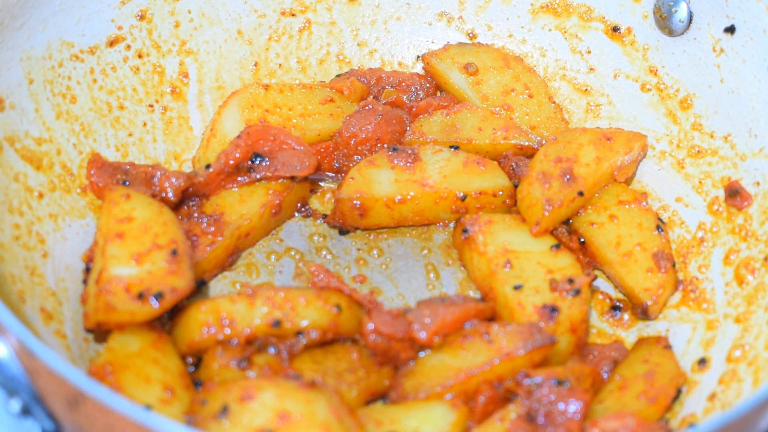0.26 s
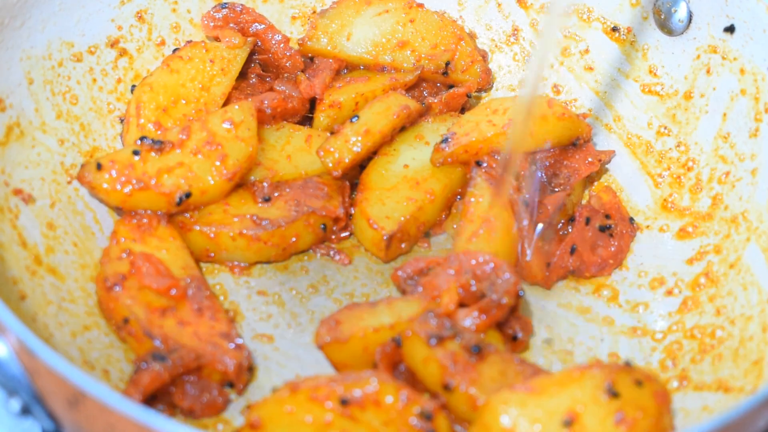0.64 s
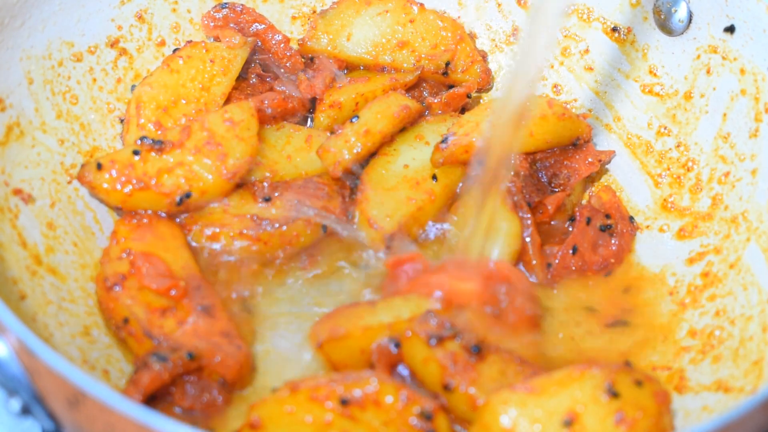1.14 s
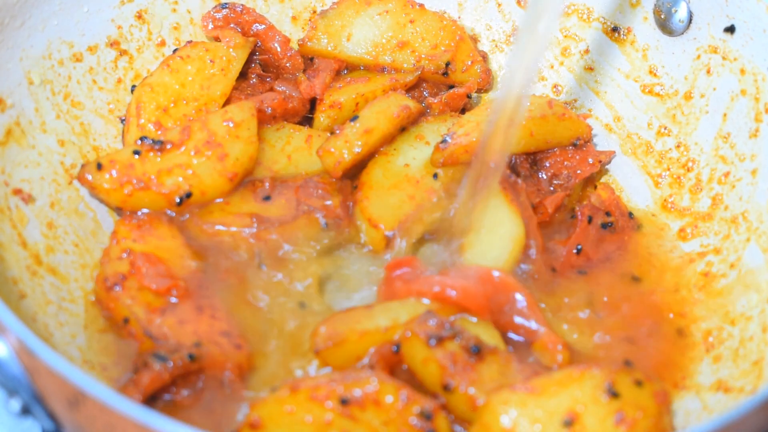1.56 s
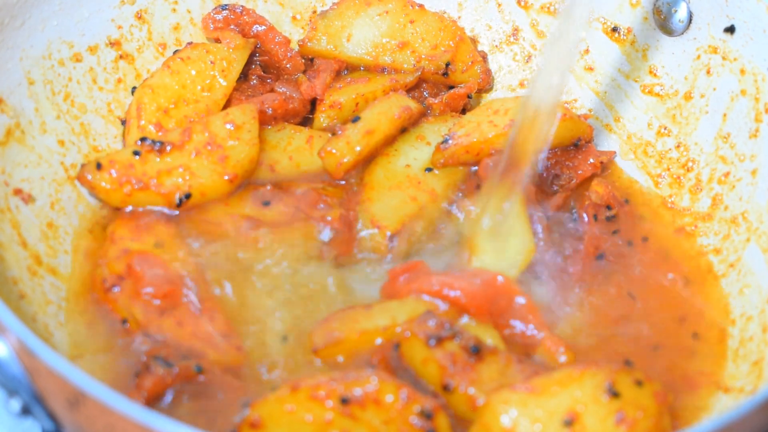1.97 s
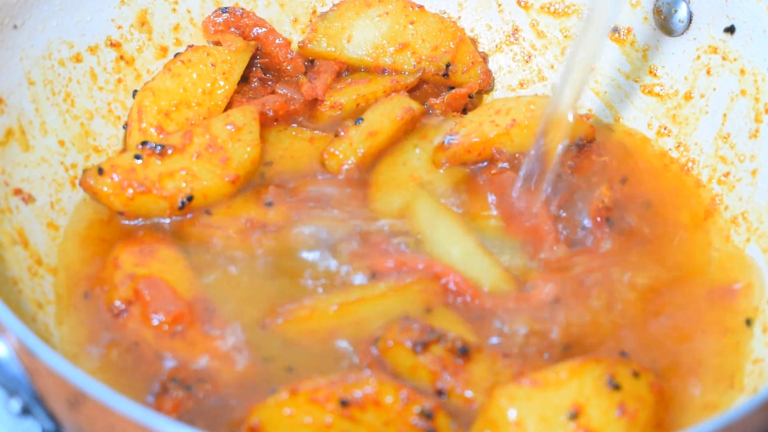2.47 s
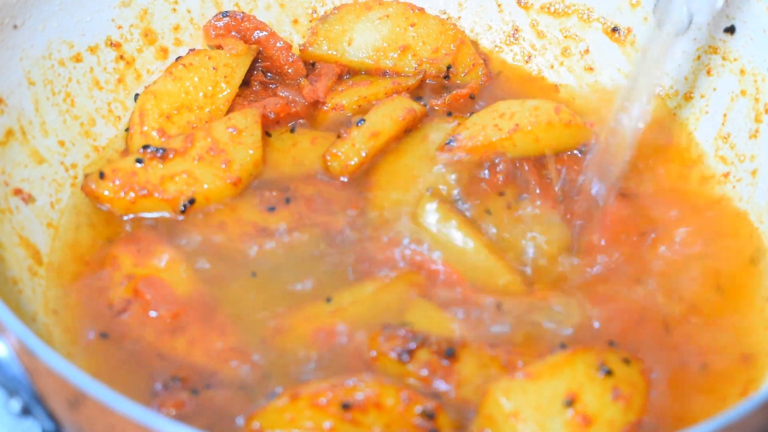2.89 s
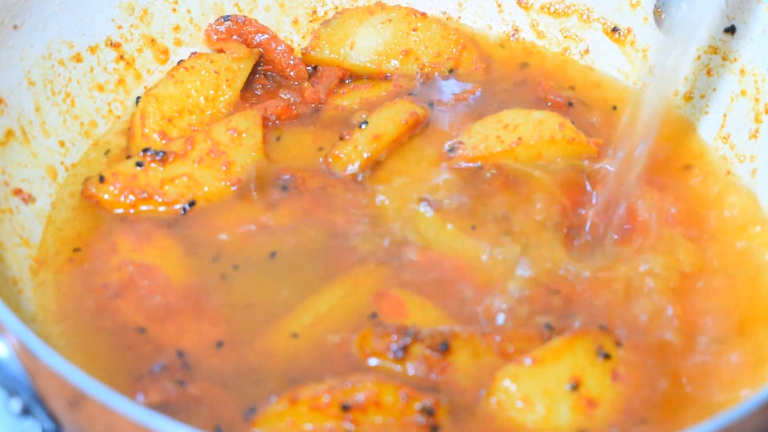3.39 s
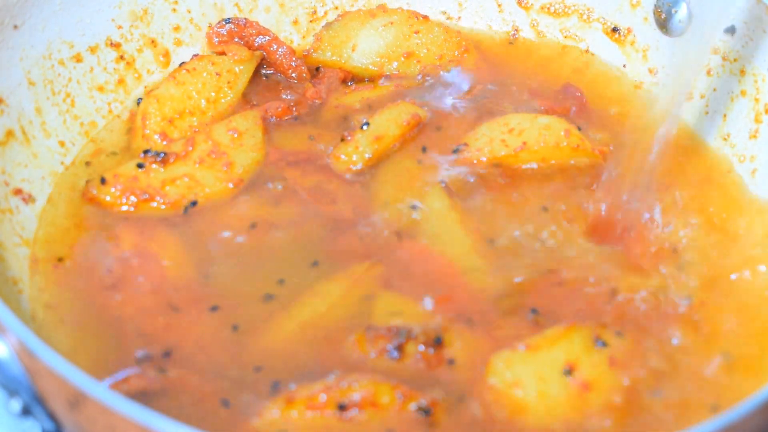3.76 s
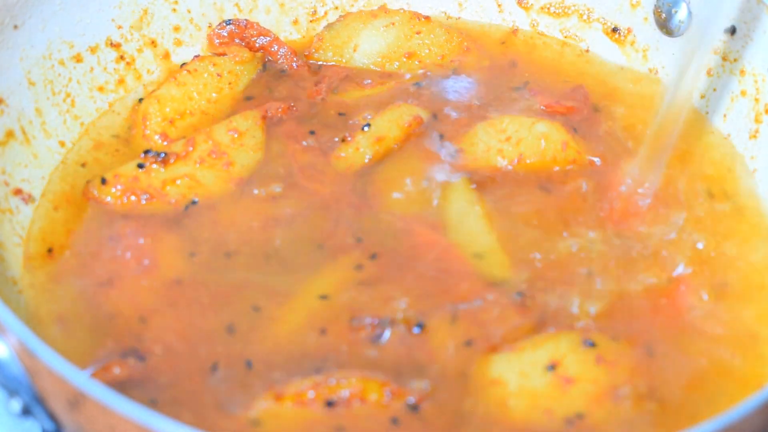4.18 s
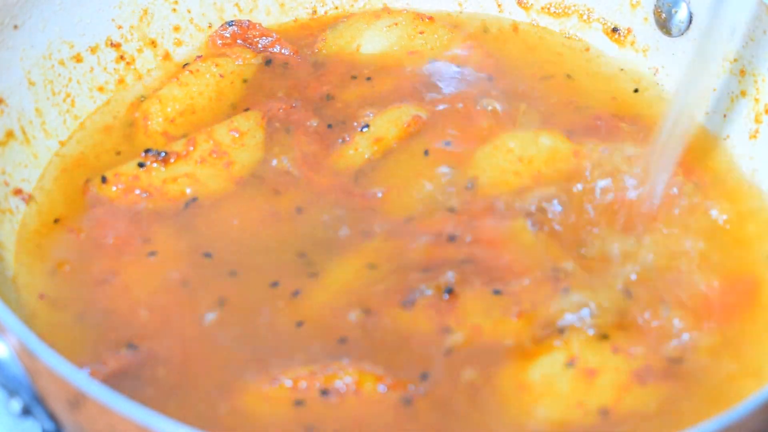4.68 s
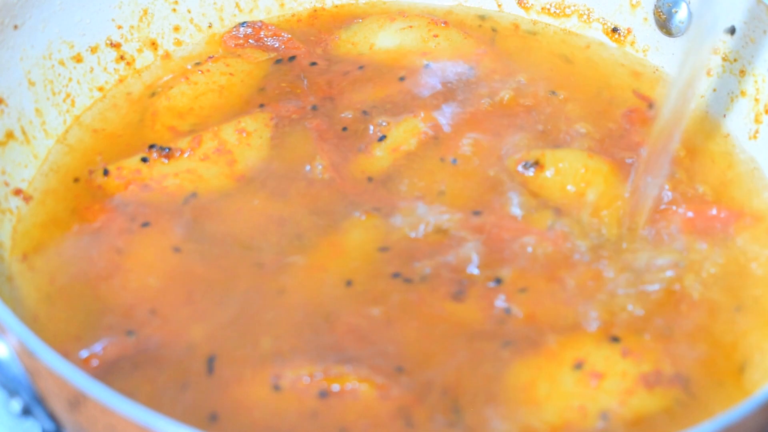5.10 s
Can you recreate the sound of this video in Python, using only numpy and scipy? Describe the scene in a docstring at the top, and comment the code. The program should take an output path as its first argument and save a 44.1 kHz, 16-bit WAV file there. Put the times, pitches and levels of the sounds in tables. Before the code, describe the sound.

Fried potatoes crackle softly in hot oil with a faint breathy whistle, recorded close in a small room. Poured water then quenches them with a rushing, hissing boil, strongest from one to two seconds. As the pool deepens, the spray thins and separate ringing bubbles, splashes and short glugs stand out until the end, the pour still running.

```python
"""Water poured on sizzling potatoes

Potatoes sizzle in a hot metal pan, made of tiny bursts, while a knock dies away in noise-driven resonances.
A stream of water hits the metal and boils up in a dense fizz: random clicks, each ringing as a bubble.
As the pan fills and cools, the bubbling slows, comes in surges and takes on sharper resonances.
Swelling tones make separate plinks and low gulps; spray, snapping droplets and breathy whistles lie around them."""
import sys
import numpy as np
from scipy import signal
from scipy.fft import rfft, irfft, next_fast_len
from scipy.io import wavfile
from scipy.ndimage import uniform_filter1d, map_coordinates

SR = 44100
rng = np.random.default_rng(int(sys.argv[2]) if len(sys.argv) > 2 else 0)


def waveform_to_disk(signal):
    """Save audio, clipped to [-1, 1], as 16-bit WAV at the path in sys.argv[1]."""
    frames = np.transpose(np.atleast_2d(signal))
    scaled = np.clip(frames, -1, 1) * 32767
    samples = np.round(scaled).astype(np.int16)
    wavfile.write(sys.argv[1], SR, samples)


N = 235229
TIME = np.arange(N) / SR  # s
LANDING_S = 0.708  # the water reaches the pan
COVERING_S = 0.3  # time scale of the change as the water rises
SURGE_ATTACK_S, SURGE_RELEASE_S = 0.007, 0.026


def from_db(db):
    """Decibels to gain."""
    return 10 ** (np.asarray(db) / 20)


def in_time(curve):
    """A curve of (time [s], level [dB]) read out at every sample."""
    seconds, levels = np.transpose(curve)
    return np.interp(TIME, seconds, levels)


def at_hz(points, hz):
    """Gain of a colour, joined up over octaves; outside its ends it falls by 60 dB per octave."""
    known_hz, db = np.transpose(points)
    octaves, known = np.log2(np.maximum(hz, 1)), np.log2(known_hz)
    outside = np.abs(octaves - np.clip(octaves, known[0], known[-1]))
    return from_db(np.interp(octaves, known, db) - 60 * outside)


def coloured(x, points):
    """Give a sound a fixed spectral colour."""
    size = next_fast_len(N)
    hz = np.arange(size // 2 + 1) * SR / size
    return irfft(rfft(x, size) * at_hz(points, hz), size)[..., :N]


def band(x, low_hz, high_hz, order=2):
    """Causal band-pass."""
    sos = signal.butter(order, [low_hz, high_hz], "band", fs=SR, output="sos")
    return signal.sosfilt(sos, x)


def resonate(x, hz, width_hz):
    """A two-pole resonance with gain 1 on top; the narrower it is, the longer it rings."""
    r = np.exp(-np.pi * width_hz / SR)
    feed = np.array([1, 0, -1]) * (1 - r * r) / 2
    poles = [1, -2 * r * np.cos(2 * np.pi * hz / SR), r * r]
    return signal.lfilter(feed, poles, x + 1e-18)  # the offset keeps silence numerically fast


def noise_ring(hz, width_hz):
    """Noise through the same resonance twice, for a steep narrow band, brought to level 1."""
    ring = resonate(resonate(rng.standard_normal(N), hz, width_hz), hz, width_hz)
    return ring / ring.std()


def lifted(x, modes):
    """Resonances added to a sound raise or hollow its bands."""
    return x + sum((from_db(db) - 1) * resonate(x, hz, width) for hz, width, db in modes)


def steady(x, span_s=0.072):
    """Hold the slow level of a stereo texture at 1."""
    power = uniform_filter1d(x.mean(axis=0) ** 2, int(span_s * SR), mode="reflect")
    return x / np.sqrt(np.maximum(power, 1e-3 * power.mean()))


def add(out, s, sound):
    """Mix a sound in at a time."""
    start = max(round(s * SR), 0)
    part = sound[..., :max(N - start, 0)]
    out[..., start:start + part.shape[-1]] += part


def swell(s, hold_s, release_s):
    """Quick attack, hold, exponential release."""
    age = np.maximum(TIME - s, 0)
    return (1 - np.exp(-age / SURGE_ATTACK_S)) * np.exp(-np.maximum(age - hold_s, 0) / release_s)


def drift(per_s):
    """Slow random wandering between values drawn so many times a second."""
    steps = rng.standard_normal(SR)
    return np.interp(TIME * per_s, np.arange(SR), steps)


def kitchen(x, wet_db, near_s=0.0042, near_db=7):
    """Quick reflections off pan and hob, then the room; the channels differ mostly in the treble."""
    t60_s, apart_hz = 0.26, 13500
    t = TIME[:SR // 2]
    near = 1 + from_db(near_db) * np.exp(-t / near_s)
    fade = from_db(-60 * t / t60_s) * near * (t > 0.0015)
    mid, side = rng.standard_normal((2, len(t))) * fade / np.linalg.norm(fade)
    side = signal.lfilter(*signal.butter(1, apart_hz, "high", fs=SR), side)
    wet = signal.fftconvolve(np.atleast_2d(x), [mid + side, mid - side], axes=1)[:, :N]
    return x + from_db(wet_db) * wet


def wall_echo(x, echo_db):
    """The wall behind the hob returns one quick echo, which ripples the spectrum."""
    lag = int(0.00307 * SR)
    return x + from_db(echo_db) * np.pad(x, ((0, 0), (lag, 0)))[:, :N]


def cavity(x):
    """The air between water and pan wall lifts a few bands and hollows one."""
    # air resonances: (centre [Hz], width [Hz], level [dB])
    air_modes = [(1464, 110, -7.5), (1783, 47, 6.5), (2270, 350, 4.5), (2885, 460, 4.5), (3690, 230, 1.5)]
    return lifted(x, air_modes)


def hollow(x):
    """Over the deeper pool the air rings in narrow bands with dark valleys between."""
    # air resonances over the deeper pool: (centre [Hz], width [Hz], level [dB])
    air_modes = [(2020, 40, -6), (2373, 326, 0.5), (2872, 90, 3), (3240, 150, 4.5), (3614, 190, -0.5),
                 (3910, 290, -2)]
    return sum(from_db(db) * resonate(x, hz, width) for hz, width, db in air_modes)


def wall_ring(x):
    """The metal wall sings along with the bubbles, a faint ring at its own pitches."""
    # resonances of the metal: (centre [Hz], width [Hz], level [dB])
    metal_modes = [(584, 19, 6.5), (1567, 27, -2), (1816, 24, 4.5)]
    return from_db(-0.5) * lifted(x, metal_modes)


def deepening(x):
    """As the water rises, the space above it colours the bubbling more and more sharply."""
    # peaks and valleys of the filling pan: (centre [Hz], width [Hz], level [dB])
    deep_modes = [(1740, 130, -9), (2144, 64, -14), (2790, 46, -6), (3460, 76, -10), (3740, 70, -7),
                  (4450, 100, -17), (4558, 50, 9)]
    half_deep_s = 3.8
    deep = x
    for hz, width, db in deep_modes:
        deep = deep + (from_db(db) - 1) * resonate(deep, hz, width)
    return x + (deep - x) / (1 + np.exp((half_deep_s - TIME) / COVERING_S))


def hollowed(hiss):
    """One band of the hiss hollows out during each lull."""
    # lulls: (time [s], half length [s], centre [Hz], half width [Hz], depth [dB])
    lulls = [(.82, 0.2, 2020, 116, -18), (4.207, 0.083, 5650, 1100, -6), (4.82, 0.055, 6430, 1100, -10),
             (4.989, .075, 2700, 140, -21)]
    size = next_fast_len(N)
    hz, spectrum = np.arange(size // 2 + 1) * SR / size, rfft(hiss, size)
    for s, half_s, centre_hz, width_hz, db in lulls:
        middle = irfft(spectrum * np.exp(-((hz - centre_hz) / width_hz) ** 4), size)[:, :N]
        dip = from_db(db * np.exp(-((TIME - s) / half_s) ** 2))
        hiss = hiss + middle * (dip - 1)
    return hiss


def sloshing(x, swing=0.04, per_s=15):
    """The water keeps moving: a wavering playback speed keeps each spot from holding one pitch."""
    position = np.cumsum(1 + swing * np.sin(per_s * 2 * TIME + drift(per_s)))
    return np.array([map_coordinates(channel, [position], order=2, mode="mirror") for channel in x])


def bubbles(colour, per_s, cycles, spread_db, scatter_db, wet_db, count=14, groups=4, body=cavity):
    """Bubbles burst at spots of fixed pitch, each ringing down 60 dB in some cycles; level 1."""
    out, low_hz, high_hz = 0, colour[0][0], colour[-1][0]
    for side in np.linspace(-1, 1, groups):
        born = np.flatnonzero(rng.random(N) < per_s / groups / SR)
        loudness_db = spread_db * np.minimum(rng.exponential(1, len(born)), 4.5)
        strengths = from_db(loudness_db) * rng.choice([-1, 1], len(born))
        dealt, group = rng.integers(0, count, len(born)), 0
        pitches = low_hz * (high_hz / low_hz) ** ((np.arange(count) + rng.random(count)) / count)
        for k, hz in enumerate(pitches):
            clicks = np.zeros(N)
            clicks[born] = strengths * (dealt == k)
            group += resonate(clicks, hz, np.log(1000) / np.pi * hz / cycles)
        # every group has its own direction and its own reflections
        out += kitchen(group, wet_db) * from_db(scatter_db * side * np.array([[1], [-1]]))
    return steady(coloured(body(sloshing(out)), colour))


def bubble_tone(hz, swell_cycles, rise):
    """A bubble swells as its neck closes, then dies; its pitch climbs as it nears the surface."""
    t = TIME[:SR // 10]
    age = t * hz / swell_cycles
    pitch = hz * (1 + rise * np.tanh((age - 1) / 2))
    return age ** 2 * np.exp(1 - age ** 2) * np.sin(2 * np.pi * np.cumsum(pitch) / SR)


def kitchen_hush():
    """The quiet background of the kitchen: steady coloured noise."""
    # colour of the hush: (frequency [Hz], level [dB])
    hush_colour = [(30, -20), (70, -15.5), (165, -3.5), (220, -3.5), (700, 8.5), (1500, 9), (4000, -20.5)]
    hush = coloured(rng.standard_normal(N), hush_colour)
    return from_db(-69) * hush / hush.std()


def knock(ring_t60_s=0.31, attack_s=0.00019):
    """A rough clatter dies away in the resonances of the pan."""
    # the knocked pan: (centre [Hz], width [Hz], level [dB])
    pan_modes = [(678, 190, -49), (940, 120, -43.5), (1236, 89, -47), (1750, 640, -37.5), (2270, 3100, -39)]
    clatter = sum(from_db(db) * noise_ring(hz, width) for hz, width, db in pan_modes)
    return clatter * from_db(-60 * TIME / ring_t60_s) * (1 - np.exp(-TIME / attack_s))


def frying():
    """Moisture bursts in hot oil as a fine crackle; it drops and thins, then the water puts it out."""
    # colour of the crackle: (frequency [Hz], level [dB])
    fry_colour = [(1700, -21), (2200, -16), (2460, -9), (2700, -7), (3050, -9.5), (3900, 0), (5000, -3.5),
                  (6200, -6), (8500, -2.5), (11500, -6.5), (15500, -15.5)]
    drop_s, drop_db, low_cut_db, low_hz = 0.626, -5, -4, 4500
    crackle = bubbles(fry_colour, 9000, cycles=4.5, spread_db=3.0, scatter_db=2.0, wet_db=-1.5, groups=3)
    thin = coloured(crackle, [(20, low_cut_db), (low_hz, low_cut_db), (2 * low_hz, 0), (SR / 2, 0)])
    quench = np.exp(-np.maximum(TIME - LANDING_S, 0) / 0.89)
    return np.where(TIME < drop_s, crackle, from_db(drop_db) * thin) * from_db(-43.5) * quench


def steam():
    """Gaps between the pieces sing as steam and bubbles pass: thin, breathy whistles of narrow noise."""
    # whistles: (time [s], length [s], pitch [Hz], level [dB])
    whistles = [(0.085, 0.41, 2466, -57.5), (0.387, 0.095, 1990, -65), (0.832, 0.26, 1815, -60),
                (1.244, 0.24, 1420, -53), (2.15, 0.35, 1823, -56), (2.593, 0.072, 1797, -52),
                (3.08, 0.095, 1810, -53), (4.05, 0.097, 1550, -58.5), (4.49, 0.078, 1560, -52.5),
                (4.955, .05, 2020, -52.5)]
    out = 0
    for s, length, hz, db in whistles:
        out += from_db(db) * swell(s, length, SURGE_RELEASE_S) * noise_ring(hz, width_hz=110)
    return out


def spits(trim_db=0.5, snap_s=0.001):
    """Droplets spit on the metal: sharp snaps of noise in two bands."""
    # snaps: (time [s], level before trim [dB], weight of the low part [dB])
    snaps = [(0.25, -32, 1), (0.702, -19, -9.5), (.742, -30.5, 0), (3.021, -28, -17.5), (3.6688, -30, -4),
             (4.0563, -31.5, -3), (4.3471, -29, 8), (4.9839, -28.5, -10), (5.0976, -26, 4)]
    out, t = np.zeros(N), TIME[:SR // 50]
    for s, db, weight_db in snaps:
        high, low = rng.standard_normal((2, len(t))) * np.exp(-t / snap_s)
        snap = band(high, 7400, 11800) + from_db(weight_db) * band(low, 3100, 5500)
        add(out, s, from_db(db + trim_db) * snap / np.abs(snap).max())
    return kitchen(out, wet_db=-4)


def slap():
    """The stream slips off a potato and slaps the pool: one hard, broad crack, a band-passed click."""
    click = np.arange(N) == round(2.4554 * SR)
    crack = band(click + 1e-18, 1450, 5200, order=4)
    return kitchen(from_db(-20) * crack / np.abs(crack).max(), wet_db=-2)


def gulps(glug_db=-17, glug_s=0.00475):
    """Air trapped between potato pieces comes up in lower notes, each breaking up in a brief glug."""
    # larger pockets of air: (time [s], level [dB], pitch [Hz], time to swell [cycles])
    pockets = [(2.449, -49, 1105, 12), (2.962, -46.5, 1125, 8.4), (2.966, -54, 654, 4.7),
               (3.015, -55, 1137, 8.8), (3.095, -51, 880, 3.4), (3.384, -47, 890, 5.9),
               (3.402, -31.5, 892, 2.9), (3.403, -37.5, 654, 4.4), (3.432, -44.5, 780, 3.2),
               (3.667, -49.5, 700, 3.1), (3.787, -44.5, 1381, 8), (4.057, -39.5, 1554, 8.8),
               (4.389, -45.5, 1387, 9.7), (4.509, -37, 1474, 7.2), (4.89, -49, 1454, 9.7)]
    out, t = np.zeros(N), TIME[:SR // 10]
    for s, db, hz, cycles in pockets:
        glug = band(rng.standard_normal(len(t)), hz * 0.69, hz * 1.64, order=3)
        glug = from_db(glug_db) * glug / glug.std() * np.exp(-t / glug_s)
        add(out, s, from_db(db) * (bubble_tone(hz, cycles, rise=0.021) + glug))
    return kitchen(out, wet_db=1.0, near_db=3)


def plinks(trim_db=-0.84, splash_db=-16, splash_s=0.019, pop_db=-9.5, pop_s=0.0024):
    """Each plink pops, sets the hollow of the pan ringing and throws a short splash of noise."""
    # single bubbles that ring out: (time [s], level before trim [dB], pitch [Hz])
    single_bubbles = [(.081, -30, 4580), (2.4541, -26.5, 2316), (2.7823, -32, 2358), (2.8295, -30, 2160),
                      (2.8479, -32, 2250), (2.8751, -32, 2350), (2.8953, -30, 2290), (3.053, -32, 2600),
                      (3.2025, -27, 2250), (3.274, -29.5, 2310), (3.2936, -26, 3080), (3.388, -32, 3200),
                      (3.5979, -29.5, 2395), (3.666, -30.5, 2300), (3.7415, -32, 3230),
                      (3.7575, -25.5, 3278), (3.9215, -15.5, 2394), (4.0338, -26.5, 2335),
                      (4.055, -20.5, 2270), (4.1308, -25.5, 2170), (4.173, -29.5, 2904),
                      (4.3206, -28.5, 2620), (4.4011, -27, 2396), (4.4956, -29, 2875),
                      (4.5448, -33.5, 2360), (4.588, -33, 4000), (4.663, -26.5, 2255), (4.667, -35, 4700),
                      (4.6784, -36, 2350), (4.781, -37, 2380), (4.8935, -28.5, 3320), (4.9546, -28.5, 2050),
                      (4.9819, -28.5, 2140), (4.9991, -34, 2470), (5.063, -27, 2296), (5.0845, -27.5, 2340),
                      (5.275, -37, 2390), (5.319, -31, 2270)]
    out, t = np.zeros(N), TIME[:SR // 10]
    for s, db, hz in single_bubbles:
        splash = band(rng.laplace(size=len(t)), 2960, 4900)
        splash = splash * np.exp(-t / splash_s) * (1 - np.exp(-t / pop_s))
        pop = band(rng.standard_normal(len(t)), 1800, 5500) * t / pop_s * np.exp(1 - t / pop_s)
        ringing = hollow(from_db(splash_db) * splash + from_db(pop_db) * pop)
        tone = bubble_tone(hz, swell_cycles=6.6, rise=0.018)
        add(out, s, from_db(db + trim_db) * (tone + ringing))
    return kitchen(out, wet_db=-5, near_db=0)


def surges(big_release_s=0.045):
    """The plunging stream drags clouds of air under: strength of small and of lingering bigger bubbles."""
    # clouds: (time [s], length [s], level [dB], weight of the bigger bubbles [dB])
    clouds = [(2.452, 0.055, -43.5, -7), (2.807, 0.08, -45, -10), (3.047, 0.1, -45.5, -19),
              (3.267, 0.044, -43.5, -21), (3.377, 0.027, -41, -21), (3.601, 0.081, -45.5, -41),
              (3.729, .15, -43.5, -29), (3.908, 0.079, -39.5, -30), (4.048, 0.13, -45, -26),
              (4.33, 0.095, -45.5, -14.5), (4.482, 0.14, -45, -10.5), (4.661, 0.032, -44, -23),
              (4.879, 0.12, -52, -10), (5.078, 0.028, -43, -24.5)]
    small = sum(from_db(db) * swell(s, length, SURGE_RELEASE_S) for s, length, db, _ in clouds)
    big = sum(from_db(db + weight_db) * swell(s, length, big_release_s) for s, length, db, weight_db in clouds)
    return small, big


def small_bubbles(per_s, covered):
    """The fizz on bare metal gives way to longer-ringing bubbles of the pool as the water rises."""
    # colours on metal and in the pool: (frequency [Hz], level [dB])
    boil_colour = [(2160, 4.5), (2280, 3), (3000, 0.5), (3900, 3.5), (4700, 1), (5400, -6)]
    pool_colour = [(1930, -4), (2200, 3), (3000, -3), (5000, -8.5)]
    boil = bubbles(boil_colour, per_s * 0.7, cycles=11.7, spread_db=4.5, scatter_db=1, wet_db=1.5, count=10)
    pool = bubbles(pool_colour, per_s * 0.36, cycles=38, spread_db=3.0, scatter_db=1.7, wet_db=-2.5,
                   groups=2, body=hollow)
    return from_db(-0.1) * np.sqrt(1 - covered) * boil + from_db(-2.04) * np.sqrt(covered) * pool


def middling_bubbles(per_s):
    """A narrow range of bubbles, lower than the fizz."""
    # colour: (frequency [Hz], level [dB])
    middling_colour = [(1600, -2.5), (1800, 0.43), (2100, 2)]
    return bubbles(middling_colour, per_s * 0.1, cycles=28, spread_db=3.5, scatter_db=0.5, wet_db=5.5,
                   count=3, groups=2)


def large_bubbles(per_s):
    """Low, long-ringing bubbles."""
    # colour: (frequency [Hz], level [dB])
    large_colour = [(780, -21), (920, -16.5), (1030, -21), (1220, -14), (1380, 0), (1490, -4.5), (1590, 6)]
    return bubbles(large_colour, per_s * 0.12, cycles=51, spread_db=4.5, scatter_db=1.0, wet_db=2.0,
                   count=6, groups=2)


def spray(per_s):
    """Spray thrown up by the stream thins out as the pool deepens; splashes fling brief showers of it."""
    # colours of the spray and of the shower on top of it: (frequency [Hz], level [dB])
    spray_colour = [(4500, -2), (5500, 0), (8500, 0.5), (11000, -4), (15800, -16)]
    shower_colour = [(4300, 11.5), (7200, 0.5), (8500, 0), (15800, 3)]
    # spray before trim, and splashes: (time [s], level [dB])
    spray_curve = [(.75, -48), (1.12, -46), (1.26, -40.5), (1.55, -44), (2.0, -43.5), (2.25, -46),
                   (2.9, -47), (3.25, -49.5), (3.95, -52), (4.22, -55.5), (4.6, -53), (4.83, -55.5),
                   (5.3, -55)]
    splashes = [(3.39, -49.5), (3.915, -52), (4.337, -44.5), (4.515, -51.5), (4.979, -50.5), (5.09, -45)]
    trim_db, shower_s = 0.5, 0.045
    ticking = bubbles(spray_colour, per_s * 1.8, cycles=23.7, spread_db=4.5, scatter_db=1.5, wet_db=2, count=10)
    ticking = wall_echo(ticking, echo_db=-16.5)
    showers = sum(from_db(db) * swell(s, SURGE_ATTACK_S, shower_s) for s, db in splashes)
    # shifted by half a second, so the showers do not double the spray under them
    shower_drops = coloured(np.roll(ticking, SR // 2, axis=1), shower_colour)
    return ticking * from_db(trim_db + in_time(spray_curve)) + shower_drops * showers


def churn(trim_db=1, uneven_db=4.5):
    """The stream churns the pool in an uneven low rumble of bubbles."""
    # colour: (frequency [Hz], level [dB])
    churn_colour = [(240, -18.5), (420, -10), (590, 2), (730, -1.5), (1150, 0)]
    # churning before trim: (time [s], level [dB])
    churn_curve = [(.75, -96), (1.35, -83), (2.92, -78), (3.11, -67), (3.27, -71.5), (5.0, -71.5),
                   (5.25, -72.5)]
    rumble = bubbles(churn_colour, 450, cycles=16, spread_db=3, scatter_db=0.4, wet_db=-2, groups=2)
    return rumble * from_db(in_time(churn_curve) + trim_db + uneven_db * drift(12))


def pour():
    """Water boils on bare metal, then bubbles more slowly and in surges in the deepening pool."""
    # vigour of the bubbling where the stream lands: (time [s], level [dB])
    vigour = [(.75, -48.5), (.89, -44.5), (1.05, -42.5), (1.28, -37), (1.75, -38.5), (1.93, -37),
              (2.25, -43), (2.85, -42.5), (3.5, -45), (3.95, -43), (4.25, -50), (4.62, -42.5),
              (4.82, -47.5), (5.28, -52)]
    hot_per_s, cool_per_s, half_covered_s = 11500, 720, 2.85
    surge_per_s, surge_full_db = 450, -42  # extra bubbles in a full surge
    vigour_db = in_time(vigour)
    covered = 1 / (1 + np.exp((half_covered_s - TIME) / COVERING_S))
    small_surge, big_surge = surges()
    per_s = hot_per_s ** (1 - covered) * cool_per_s ** covered
    per_s = per_s + surge_per_s * small_surge / from_db(surge_full_db)

    # bigger bubbles follow the vigour more than dB for dB, and are damped under water
    drive_db, damped_db = vigour_db + 37.5, -3 * covered
    middling_level = from_db(-44 + 2.45 * drive_db + damped_db)
    large_level = from_db(-49.5 + 2.8 * drive_db + damped_db)

    water = small_bubbles(per_s, covered) * np.hypot(from_db(vigour_db), small_surge)
    middling = middling_bubbles(per_s) * np.sqrt(1 - covered)
    water += middling * np.hypot(middling_level, from_db(-2.5) * big_surge)
    water += large_bubbles(per_s) * np.hypot(large_level, from_db(-2) * big_surge)
    water += spray(per_s) + churn()
    landing_rise_s = 0.06
    return water * np.clip((TIME - LANDING_S) / landing_rise_s, 0, 1)


def scene(balance_db=0.6):
    """The pan stands slightly to the right, over the quiet hush of the kitchen."""
    hush = kitchen_hush()
    water = deepening(wall_ring(pour() + plinks() + gulps() + slap()))
    pan = hollowed(frying() + water) + steam() + knock() + spits()
    return pan * from_db(balance_db * np.array([[-1], [1]])) + hush


def record(dry):
    """The top is cut steeply."""
    cutoff_hz = 15900
    return signal.sosfilt(signal.ellip(12, 0.2, 80, cutoff_hz, fs=SR, output="sos"), dry)


dry = scene()
out = record(dry)
waveform_to_disk(out)
```